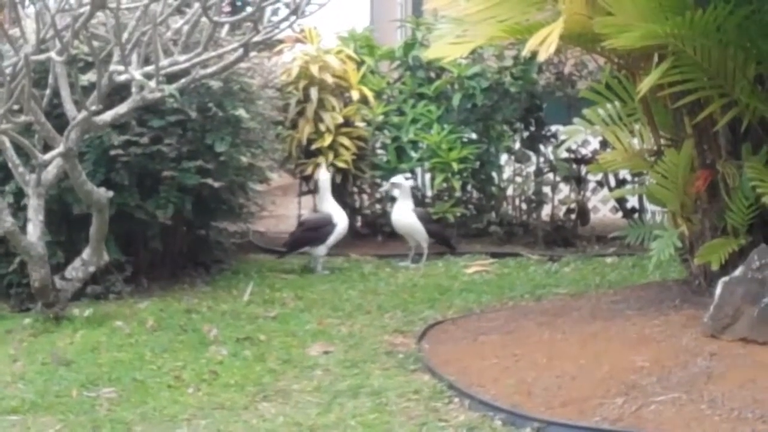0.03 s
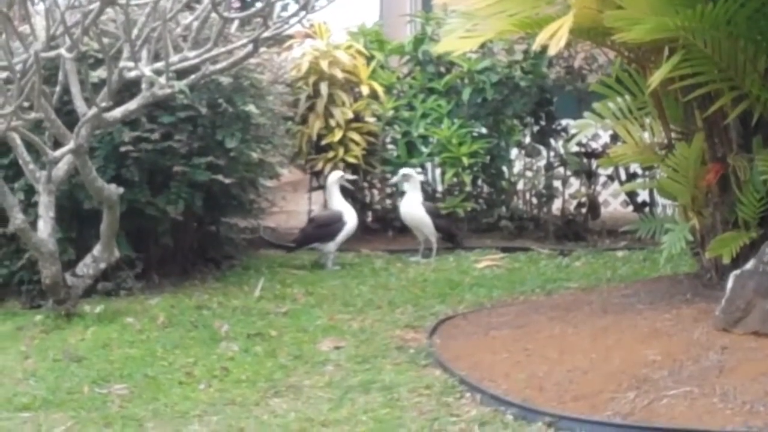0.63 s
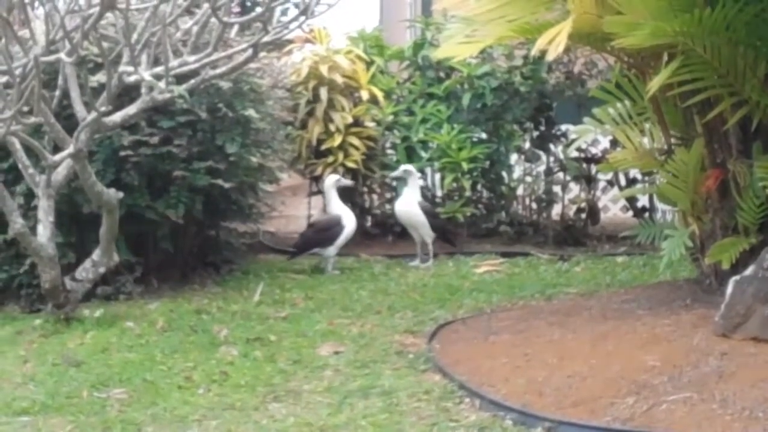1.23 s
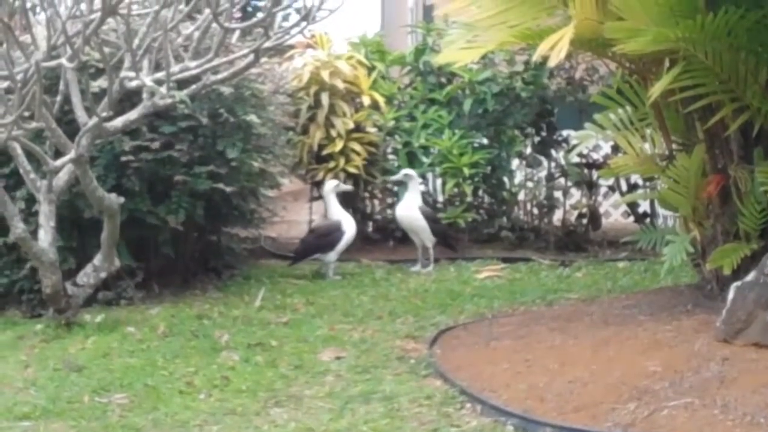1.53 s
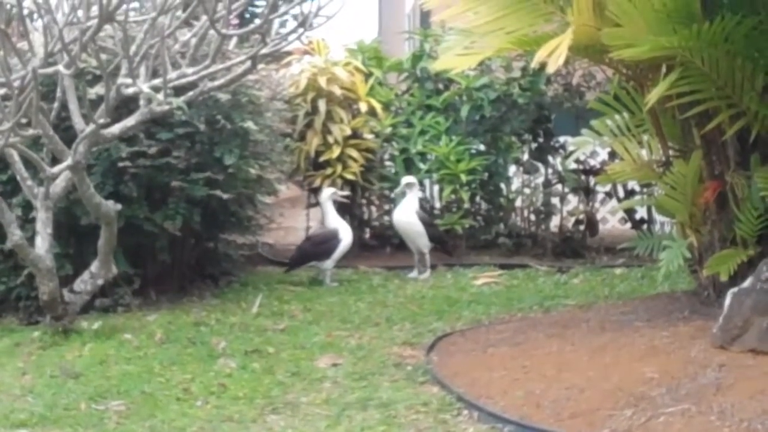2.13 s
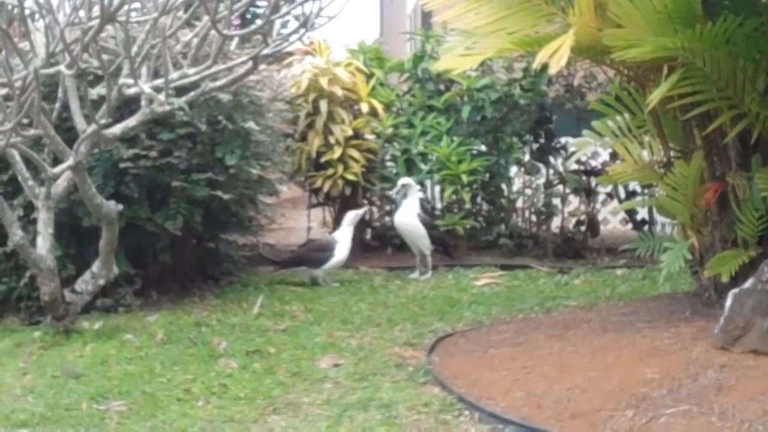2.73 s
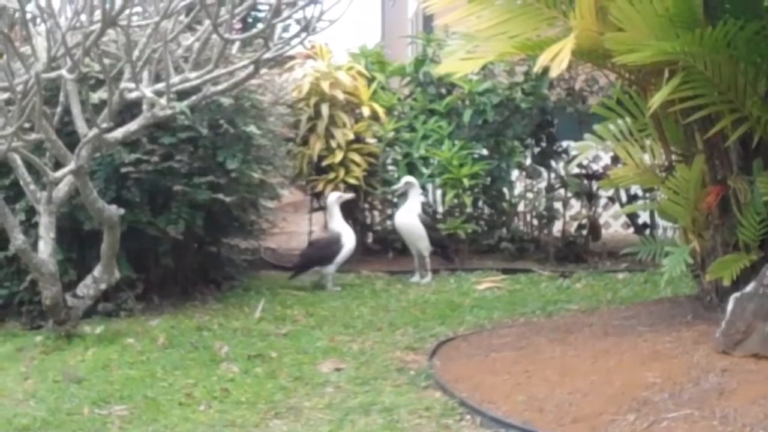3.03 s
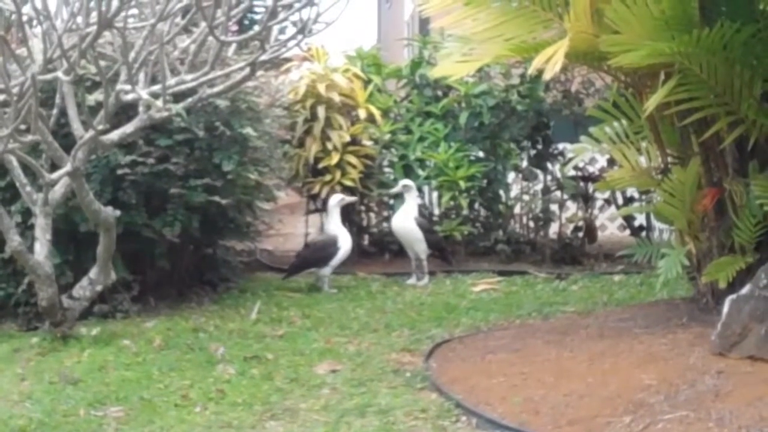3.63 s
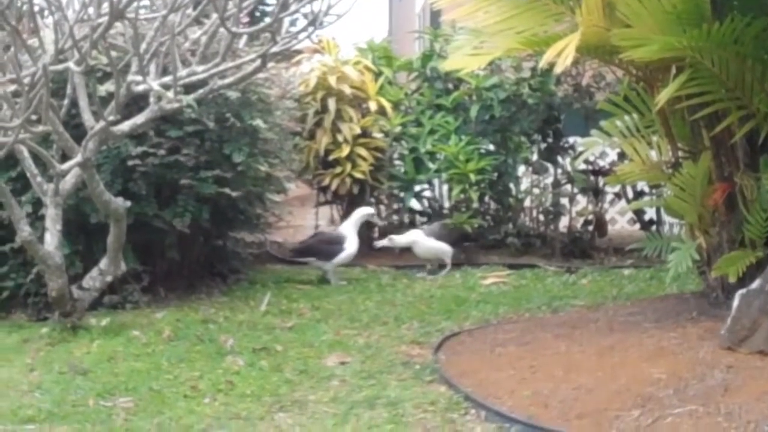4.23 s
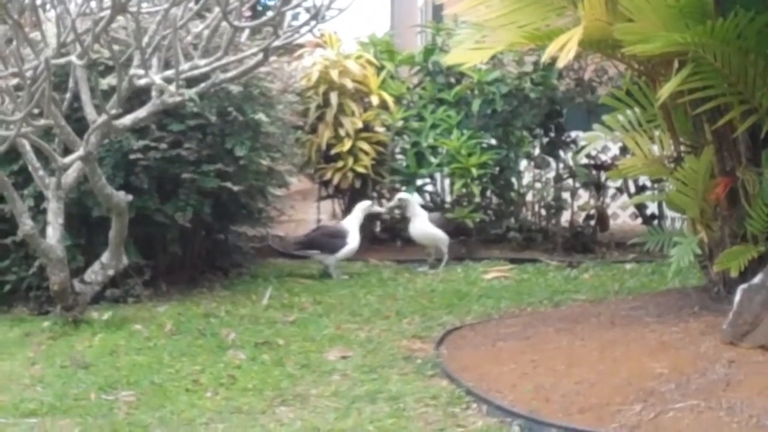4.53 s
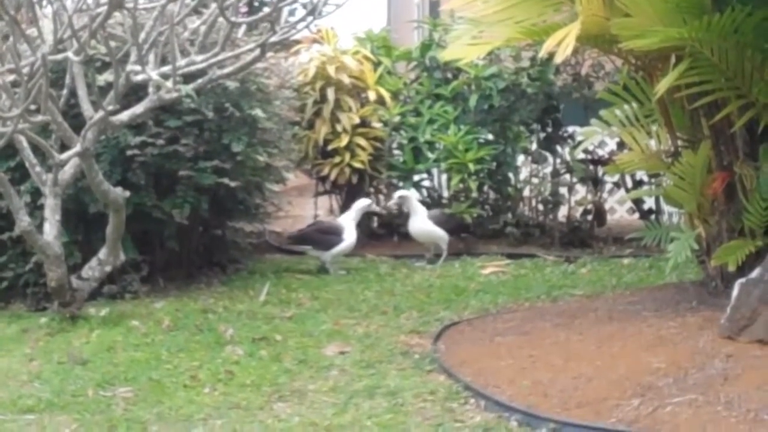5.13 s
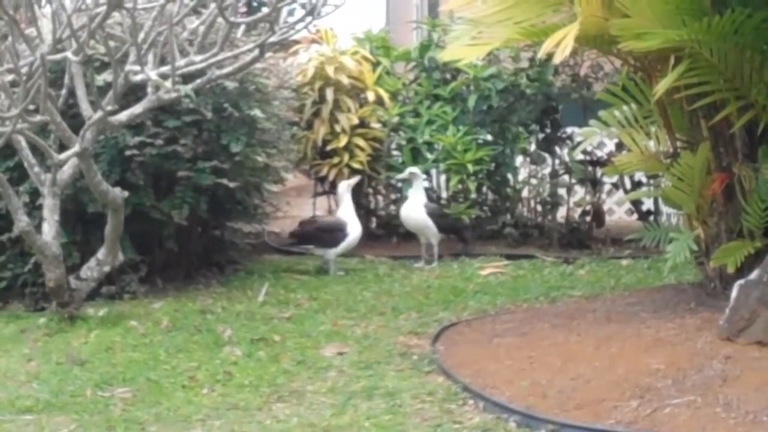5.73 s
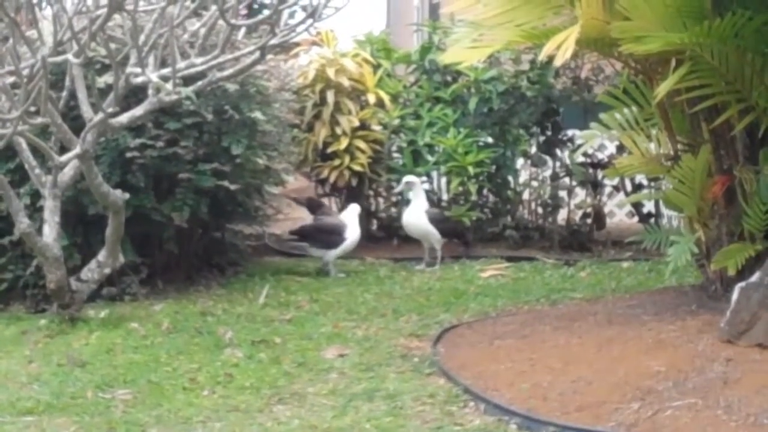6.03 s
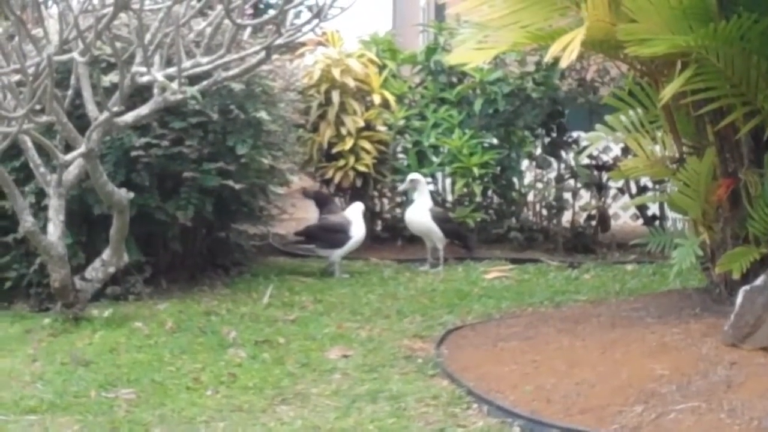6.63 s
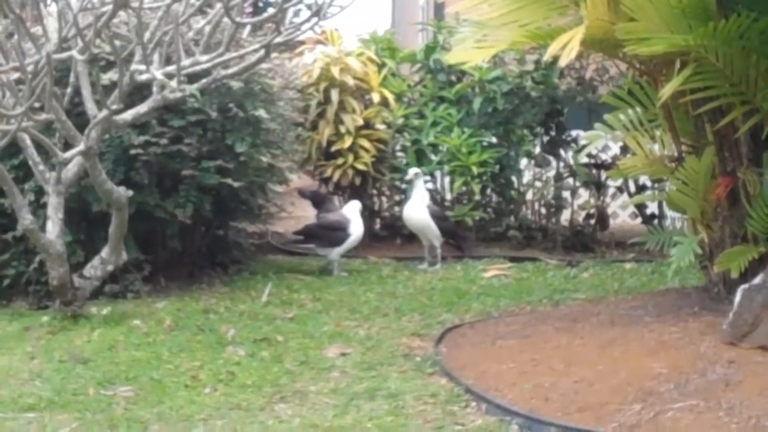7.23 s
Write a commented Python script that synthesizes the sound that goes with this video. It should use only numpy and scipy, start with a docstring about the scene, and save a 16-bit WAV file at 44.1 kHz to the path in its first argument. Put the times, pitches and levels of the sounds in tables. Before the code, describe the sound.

A faint wash of distant surf and leaves fills a garden throughout. Right at the start, an albatross gives a high, breathy whistle that sags slowly, turns hoarse and drops away by 1 second. From about 0.4 seconds its partner claps its bill in a soft, quick rattle that slows and fades, with tiny rustles around 2 seconds. At 2.3 seconds a harder, louder rattle of hollow knocks takes over, slowing slightly until 3.7. Two bursts of three sharp snaps come at 3.9 and 4.2 seconds, followed by a few light taps. A tiny hoarse squeak leads into one last clap at 5.7. A small distant bird peeps faintly near 5, 6.1 and 7.1 seconds, and a far, dull bill rattle runs from 6.2 to the end, around 7.4. The claps have a slight outdoor echo. Light wind brushes the microphone during the first four seconds.

```python
"""A long falling whistle from an albatross on a hedged lawn, while its partner softly rattles its bill.
A hard rattle follows, then two bursts of three snaps and a last clap. Each clap is the two halves of
a bill knocking together, so that bill and mouth ring; the whistle is a nearly pure note with rushing air.
Far off, other birds peep and rattle over surf and leaves. Light wind touches the microphone."""
import sys
import numpy as np
from scipy import signal
from scipy.fft import rfft, irfft, next_fast_len
from scipy.io import wavfile
from scipy.ndimage import uniform_filter1d

SR = 44100
rng = np.random.default_rng(int(sys.argv[2]) if len(sys.argv) > 2 else 0)


def file_out(sig):
    """Save sig as 16-bit WAV at sys.argv[1]."""
    # one column per channel
    cols = np.atleast_2d(sig).T
    # limit, then scale
    lim = np.clip(cols, -1, 1)
    pcm = np.round(lim * 32767).astype(np.int16)
    wavfile.write(sys.argv[1], SR, pcm)


N = 325899
TIME = np.arange(N) / SR


def amp(db):
    """Turns decibels into a gain."""
    return 10 ** (np.asarray(db) / 20)


def evened(x):
    """Scales a sound to an average (rms) level of 1."""
    return x / np.sqrt(np.mean(x ** 2) + 1e-20)


def read(points, hz):
    """Looks up a curve at hz, on a log-frequency axis."""
    f, value = np.transpose(points)
    return np.interp(np.log(hz + 1), np.log(f + 1), value)


def add(mix, start_s, sound):
    """Mixes a sound in at start_s."""
    part = mix[max(round(start_s * SR), 0):][:len(sound)]
    part += sound[:len(part)]


def noise(colour, size):
    """Noise of level 1, shaped by a colour: the strength of its lows and highs."""
    n = next_fast_len(size)
    gain = amp(read(colour, np.fft.rfftfreq(n, 1 / SR)))
    return evened(irfft(rfft(rng.standard_normal(n)) * gain, n)[:size])


def wander(hz, size):
    """A smooth random wobble, mostly slower than hz."""
    return evened(signal.sosfilt(signal.butter(2, hz, fs=SR, output="sos"), rng.standard_normal(size)))


def puffs(rows, colour, grain_db, grain_hz):
    """Short swells of grainy noise."""
    level = np.zeros(N)
    for start_s, length_s, db in rows:
        add(level, start_s, amp(db) * np.hanning(int(length_s * SR)))
    return level * evened(noise(colour, N) * amp(grain_db * wander(grain_hz, N)))


# colour of the background: frequency_hz, gain_db
AIR_COLOUR = [(15, -5), (28, 0), (60, -2.5), (130, -8), (250, -9.5), (430, -12.5), (750, -12), (1050, -15),
              (2000, -20.5), (4000, -23.5), (6000, -27), (10000, -38.5), (13500, -51)]
# how alike left and right are: frequency_hz, likeness (0 to 1)
AIR_LIKENESS = [(30, 0.99), (120, 0.85), (500, 0.83), (2000, 0.27), (6000, 0.062), (12000, 0.067)]
# its slow swell: time_s, gain_db
AIR_SWELL = [(0, 1), (3.5, 2), (4.8, 1.5), (5.8, 1), (6.3, 2), (7.39, 1.5)]

def open_air(level_db=-53):
    """Distant surf and leaves, and a faint thin whine."""
    n = next_fast_len(N)
    hz = np.fft.rfftfreq(n, 1 / SR)
    left, other = rfft(rng.standard_normal((2, n)))
    likeness = read(AIR_LIKENESS, hz)
    right = likeness * left + np.sqrt(1 - likeness ** 2) * other
    pair = irfft(np.array([left, right]) * amp(read(AIR_COLOUR, hz)), n)[:, :N]
    swell_db = np.interp(TIME, *np.transpose(AIR_SWELL)) + .5 * wander(5.4, N)
    whine = amp(-80) * wander(60, N) * np.sin(2 * np.pi * 7880 * TIME)
    return evened(pair) * amp(level_db + swell_db) + whine


# gusts of wind: start_s, length_s, level_db
GUSTS = [(0, 0.084, -44.5), (1.0, 0.18, -44.5), (1.28, 0.3, -48.5), (1.63, 0.15, -35), (3.08, 0.405, -45),
         (3.47, 0.26, -35.5)]
# their low rumble: frequency_hz, gain_db
GUST_COLOUR = [(15, -30), (35, 9.5), (80, -1), (130, -16), (300, -45), (1000, -66)]

def wind():
    """Gusts buffet the microphone, mostly on the right."""
    return puffs(GUSTS, GUST_COLOUR, grain_db=2.5, grain_hz=26.2) * amp([[-13], [-3]])


# how long the garden's echo takes to fade by 60 dB: frequency_hz, fade_s
ECHO_FADE = [(300, 0.14), (800, 0.87), (1500, 0.51), (3300, 0.57), (4500, 0.22), (6000, 0.14),
             (12000, 0.23)]
# colour of that echo: frequency_hz, gain_db
ECHO_COLOUR = [(300, -16), (750, 3.5), (1400, -2.5), (2200, 2.5), (3300, -2), (6000, 11.5), (12000, -3)]
# how fast the echo paths change: slow_hz, quick_hz
PATH_DRIFT = (0.5035, 1.202)

def garden(sound, leaves_db, wall_db, tail_db, leaves_fade_s=0.082, wall_s=0.02235, likeness=0.78):
    """Nearby leaves scatter the sound at once, a wall answers, and the garden rings on."""
    t = np.arange(SR * 3 // 4) / SR
    out = np.array([sound, sound])
    for k in range(4):  # the paths change as the birds move their heads
        taps = rng.standard_normal((3, len(t)))
        taps = np.sqrt(likeness) * taps[0] + np.sqrt(1 - likeness) * taps[1:]
        leaves = taps * amp(-60 * t / leaves_fade_s) * (t > .002)
        # the hedge dulls and smears the wall's echo
        wall = uniform_filter1d(taps, size=6) * np.exp(-((t - wall_s) / 0.0011) ** 2)
        hz, age_s, bands = signal.stft(taps, SR, nperseg=256)
        bands *= amp(read(ECHO_COLOUR, hz)[:, None] - 60 * age_s / read(ECHO_FADE, hz)[:, None])
        tail = signal.istft(bands, SR, nperseg=256)[1][:, :len(t)] * np.clip(t / 0.051, 0, 1)
        echoes = (leaves_db, leaves), (wall_db, wall), (tail_db, tail)
        paths = sum(amp(db) * echo / np.linalg.norm(echo[0]) for db, echo in echoes)
        share = np.sqrt(1 / 2) * np.cos(2 * np.pi * PATH_DRIFT[k // 2] * TIME + k * np.pi / 2)
        out = out + signal.oaconvolve((sound * share)[None], paths, axes=1)[:, :N]
    return out


def bird_note(rows, roughness, jitter, overtones=((1, 0),)):
    """A nearly pure note; roughness shakes its pitch and level, dulls it and weakens every other cycle."""
    time_s, hz, db = np.transpose(rows)
    t = np.arange(time_s[0], time_s[-1], 1 / SR)
    rough = np.interp(t, *np.transpose(roughness))
    pitch_hz = np.interp(t, time_s, hz) * (1 + jitter * rough * wander(230, len(t)))
    phase = 2 * np.pi * np.cumsum(pitch_hz) / SR
    note = np.zeros(len(t))
    for k, gain_db in overtones:
        flicker_db = (k - 1) * 1.5 * wander(30, len(t)) + 1.2 * wander(35, len(t))
        note += amp(gain_db + flicker_db - (k - 1) ** 2 * 7 * rough) * np.sin(k * phase)
    note = evened(note * (1 + rough * wander(150, len(t)) + 0.53 * rough ** 2 * np.cos(phase / 2)))
    out = np.zeros(N)
    add(out, time_s[0], note * amp(np.interp(t, time_s, db)) * signal.windows.tukey(len(t), .01))
    return out


# distant peeps: start_s, length_s, pitch_hz, fall_hz, level_db
PEEPS = [(5.005, 0.165, 3680, 287, -60.5), (6.12, 0.14, 3610, 290, -59.5), (7.108, 0.18, 3360, 40, -68.5)]

def far_peeps():
    """A small bird's thin notes: each lifts quickly, falls slowly and is softer at both ends."""
    out, progress = np.zeros(N), np.linspace(0, 1, 20)
    arch = 0.6 * np.sin(np.pi * np.sqrt(progress)) - progress
    fade_db = -2.5 * (2 * progress - 1) ** 2
    for start_s, length_s, pitch_hz, fall_hz, db in PEEPS:
        rows = np.transpose([start_s + length_s * progress, pitch_hz + fall_hz * arch, db + fade_db])
        out += bird_note(rows, roughness=[(0, 0.22)], jitter=0.028)
    return out


SETTLE_S = 0.45  # a rattle's opening tone and tight mouth relax over this time

def rattle(beat, count, level_db, db_per_s, bright_db, opening_db):
    """Lists claps whose pace, strength and tone drift: time_s, level_db, brightness_db."""
    start_s, gap_s, growth_s = beat
    k = np.arange(count)
    age_s = gap_s * k + growth_s * k ** 2 / 2
    force, edge = rng.standard_normal((count, 2)).T  # no two claps are quite alike
    level = level_db + db_per_s * age_s + 0.1 * force
    bright = bright_db + opening_db * np.exp(-age_s / SETTLE_S) + edge
    return list(zip(start_s + age_s, level, bright))


def claps(rows, bill, rebound, rebound_s, contact_s, crack_db, crack_s, low_hz, top_hz,
          scatter=0.015, tight=0, likeness=0):
    """Each closing sets the bill ringing (60 dB down after fade_s); the halves then touch again."""
    out, t = np.zeros(N), np.arange(SR // 25) / SR
    hz, db, fade_s, rise_hz_per_s = np.transpose(bill)[:, :, None]
    treble = np.clip(np.log2(hz / 1500), 0, 1)
    closing = 1 - np.exp(-t / contact_s)  # the long edges do not meet all at once
    edges = rng.standard_normal(len(t))
    for start_s, level_db, bright_db in rows:
        detune, strength = rng.standard_normal((2, len(bill), 1))
        sharp = tight * np.exp((rows[0][0] - start_s) / SETTLE_S)  # a tight mouth rings higher
        glide = rise_hz_per_s * t ** 2 / 2  # the mouth's note rises as the bill reopens
        cycles = hz * (1 + sharp + scatter * detune) * t + glide
        ring_db = db + bright_db * treble + 21 * scatter * strength - 60 * t / fade_s
        ring = (amp(ring_db) * np.sin(2 * np.pi * cycles)).sum(0)
        # the edges meet with a thin crack; likeness makes it resemble the one before
        edges = likeness * edges + np.sqrt(1 - likeness ** 2) * rng.standard_normal(len(t))
        crack = amp(crack_db + bright_db) * np.exp(-t / crack_s) * (edges - uniform_filter1d(edges, 15))
        knock = amp(level_db) * closing * (ring + crack)
        add(out, start_s, knock)
        add(out, start_s + rebound_s * (1 + 2 * scatter * rng.standard_normal()), rebound * knock)
    # a small bill gives off little bass, and its edges are not quite hard
    out = signal.sosfilt(signal.butter(4, low_hz, "high", fs=SR, output="sos"), out)
    return signal.sosfilt(signal.butter(3, top_hz, fs=SR, output="sos"), out)


# pace of the far rattle: start_s, first_gap_s, gap_growth_s
FAR_BEAT = (6.2147, 0.09128, -0.000207)
# the far bill's ringing notes: pitch_hz, level_db, fade_s, rise_hz_per_s
FAR_BILL = [(606, 1, 0.023, 0.0053), (780, -19, 0.01, 0), (1410, -27, .008, 0), (3300, -6, 0.0068, 0)]

def far_rattle():
    """A distant bird claps its bill, slowly and dully."""
    rows = rattle(FAR_BEAT, count=14, level_db=-38.5, db_per_s=1.4, bright_db=-4.5, opening_db=5)
    return claps(rows, FAR_BILL, rebound=0.12, rebound_s=0.0028, contact_s=0.00054,
                 crack_db=-20, crack_s=0.0026, low_hz=393, top_hz=5000)


# brief rustles: start_s, length_s, level_db
RUSTLES = [(.142, 0.021, -37), (1.862, 0.038, -46.5), (1.895, 0.023, -40), (2.04, 0.02, -41),
           (2.064, 0.0066, -34), (2.115, 0.0086, -37)]
# their colour: frequency_hz, gain_db
RUSTLE_COLOUR = [(400, -16), (1500, -11), (3500, -4), (5000, -4.5), (7000, -16.5), (10000, -27),
                 (14000, -38)]

def rustles():
    """Feathers and feet brush in tiny bursts of noise."""
    return puffs(RUSTLES, RUSTLE_COLOUR, grain_db=-1.5, grain_hz=500)


# shape of the squeak: time_s, pitch_hz, level_db
SQUEAK = [(5.684, 1370, -60), (5.695, 1436, -40), (5.703, 1490, -41), (5.714, 1650, -64)]

def squeak():
    """A hoarse rising note just before the last clap."""
    return bird_note(SQUEAK, roughness=[(0, 0.68)], jitter=0.079)


# the whistle sags slowly, swells, then drops away: time_s, pitch_hz, level_db
WHISTLE = [(0, 3580, -23), (0.12, 3578, -18), (0.17, 3559, -21.5), (0.45, 3492, -24), (0.655, 3460, -28),
           (0.695, 3428, -17.5), (0.755, 3360, -30), (0.785, 3357, -20.5), (0.835, 3310, -25.5),
           (0.885, 3150, -20.5), (0.95, 2800, -35), (0.97, 2620, -57)]
# it turns hoarse at the end: time_s, roughness (0 is pure)
HOARSENESS = [(0, .04), (.82, .05), (.87, .35), (.97, .45)]
# its main note and overtones: pitch_multiple, gain_db
OVERTONES = [(1, 2), (2, -19.5), (3, -20.5)]
# colour of the rushing breath: frequency_hz, gain_db
BREATH_COLOUR = [(900, -20.5), (1300, -13.5), (1600, -1), (1850, -11), (2150, 0.5), (2450, -8.5),
                 (2750, -2), (3050, -14), (3700, 2), (4400, -6.5), (6000, -16.5), (8200, -36.5),
                 (9900, -12.5), (11300, -49)]
# loudness of that breath: time_s, level_db
BREATH_LEVEL = [(0, -40), (.4, -43.5), (.8, -42), (.9, -46.5), (.97, -68)]

def long_whistle(swing_s=0.183, peak_s=0.0563, swing_hz=19.3, swing_db=0.9):
    """Air rushes through the whistling bill; the swinging head sways the note's pitch and level."""
    time_s, hz, db = np.transpose(WHISTLE)
    t = np.linspace(time_s[0], time_s[-1], 200)
    swing = np.cos(2 * np.pi * (t - peak_s) / swing_s)
    pitch_hz = np.interp(t, time_s, hz) + swing_hz * swing
    level_db = np.interp(t, time_s, db) + swing_db * swing
    note = bird_note(np.transpose([t, pitch_hz, level_db]), HOARSENESS, jitter=0.03, overtones=OVERTONES)
    breath_db = np.interp(TIME, *np.transpose(BREATH_LEVEL), right=-150)
    return note + noise(BREATH_COLOUR, N) * amp(breath_db)


# pace of the soft rattle: start_s, first_gap_s, gap_growth_s
SOFT_BEAT = (0.3669, 0.053045, 0.000333)
# notes of a gently closed bill: pitch_hz, level_db, fade_s, rise_hz_per_s
SOFT_BILL = [(750, 0.5, 0.007, 7), (1176, 6, 0.0036, 3), (1011, -10.5, 0.026, 170001),
             (2380, -6.5, 0.0085, -4), (3700, 8, 0.0024, 7), (5570, 7.5, 0.0016, -16)]

def soft_rattle():
    """Light, quick claps of the bill that slow, weaken and dull."""
    rows = rattle(SOFT_BEAT, count=35, level_db=-15.5, db_per_s=-3.0, bright_db=-1.37, opening_db=5.5)
    return claps(rows, SOFT_BILL, rebound=0.057, rebound_s=0.0018, contact_s=0.00037,
                 crack_db=-3.5, crack_s=0.0011, low_hz=558, top_hz=5930, tight=0.024, likeness=0.76)


# snaps and light taps of the bills: start_s, level_db, brightness_db
SNAPS = [(0.1445, -25, -16), (3.9065, -11.5, -11.5), (3.954, -15, -9), (4.002, -12, -10),
         (4.170, -35.5, -21), (4.2385, -15.5, -2.5), (4.285, -13, -6.5), (4.329, -12.5, -8),
         (4.4386, -35.5, -4), (4.5124, -37.5, -8.5), (4.6808, -25.5, -20), (4.7888, -37.5, -7.5),
         (6.0325, -47, -2.5), (6.2156, -47.5, 0.5)]
# notes of a snapped bill: pitch_hz, level_db, fade_s, rise_hz_per_s
SNAP_BILL = [(745, -3.5, 0.0086, -2), (1394, -3, 0.0075, -4), (2000, -2.5, 0.017, 0),
             (1522, -7.5, 0.022, 249995), (2410, 1, 0.011, 6), (3146, 2, 0.013, -7), (3595, 6.5, 0.007, 0),
             (4460, 6, 0.0054, -4), (5970, 9, 0.0028, 0), (6760, -6.5, 0.0097, 0)]

def bill_snaps():
    """Bills snap shut from wide open or tap lightly, a little differently each time."""
    return claps(SNAPS, SNAP_BILL, rebound=0.19, rebound_s=0.00239, contact_s=0.00037,
                 crack_db=-1.0, crack_s=0.0024, low_hz=490, top_hz=6100, scatter=0.06)


# pace of the hard rattle: start_s, first_gap_s, gap_growth_s
HARD_BEAT = (2.3292, 0.04702, 0.000277)
# its lead-in, its weak last stroke and the lone last clap: start_s, level_db, brightness_db
SINGLE_CLAPS = [(2.2737, -11, 1), (3.7016, -16.5, 0), (5.7305, -14, 0.5)]
# notes of a firmly closed bill: pitch_hz, level_db, fade_s, rise_hz_per_s
HARD_BILL = [(810, -5.5, 0.0077, -6), (1180, 7.5, 0.0061, -3), (1360, -10.5, 0.0028, 0),
             (1188, -2.5, 0.019, 200000), (2570, -6, 0.0097, -3), (3514, 7.5, 0.0035, -7),
             (4234, -8, 0.0073, 7), (6430, -2.5, 0.0034, -9)]

def hard_rattle():
    """Forceful claps of the bill in a slowing run, plus three off the beat."""
    rows = rattle(HARD_BEAT, count=27, level_db=-11.5, db_per_s=-0.93, bright_db=2.5, opening_db=-0.8)
    rows += SINGLE_CLAPS
    return claps(rows, HARD_BILL, rebound=0.21, rebound_s=0.001516, contact_s=0.00099,
                 crack_db=-8.5, crack_s=0.002, low_hz=500, top_hz=6080, tight=0.068, likeness=0.846)


def scene():
    """The open air, the distant birds and the courting pair."""
    mix = open_air() + wind()
    mix += garden(far_rattle(), leaves_db=-9, wall_db=-16, tail_db=-9.5)
    mix += garden(far_peeps() + long_whistle(), leaves_db=-22, wall_db=-21, tail_db=-18)
    mix += garden(rustles() + squeak() + soft_rattle(), leaves_db=-10.5, wall_db=-23, tail_db=-15.5)
    mix += garden(bill_snaps(), leaves_db=-7, wall_db=-29.5, tail_db=-19.5)
    return mix + garden(hard_rattle(), leaves_db=-11.5, wall_db=-27.5, tail_db=-17)


# balance of the microphone's two sides: frequency_hz, left_minus_right_db
MIC_BALANCE = [(60, -6.5), (250, -4), (1000, -3.5), (2500, -3.5), (5000, -3), (7000, -3), (10500, -6),
               (13000, -7.5)]

def record(dry):
    """The microphone is more sensitive on the right and cuts the highest treble."""
    n = next_fast_len(N + 2048)
    tilt_db = read(MIC_BALANCE, np.fft.rfftfreq(n, 1 / SR)) / 2
    sides = irfft(rfft(dry, n) * amp([tilt_db, -tilt_db]), n)[:, :N]
    treble_cut = signal.firwin(255, cutoff=13300, window=("kaiser", 8), fs=SR)
    return signal.oaconvolve(sides, treble_cut[None], "same")


dry = scene()
out = record(dry)
file_out(out)
```